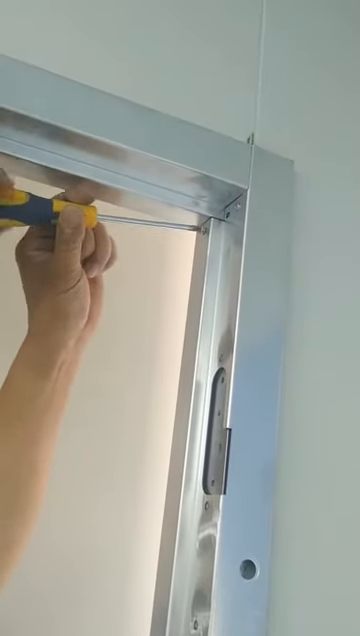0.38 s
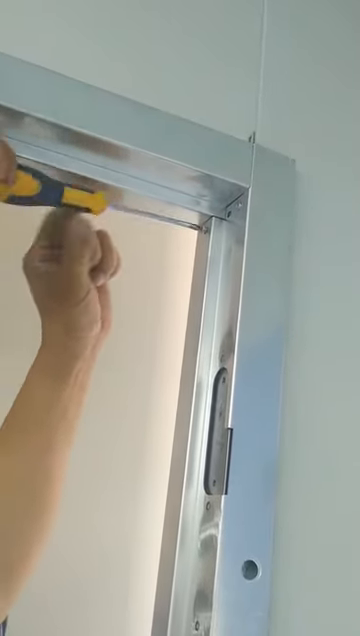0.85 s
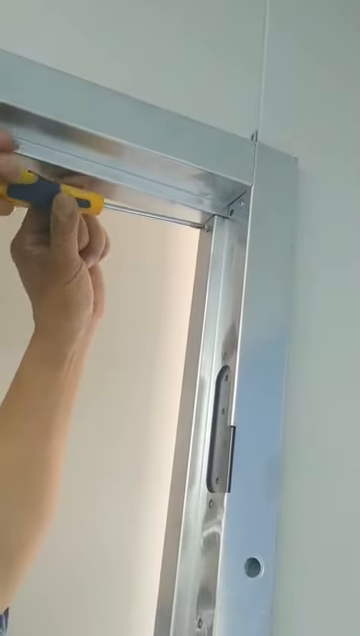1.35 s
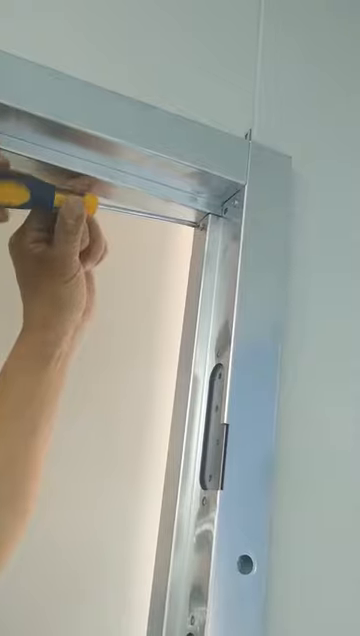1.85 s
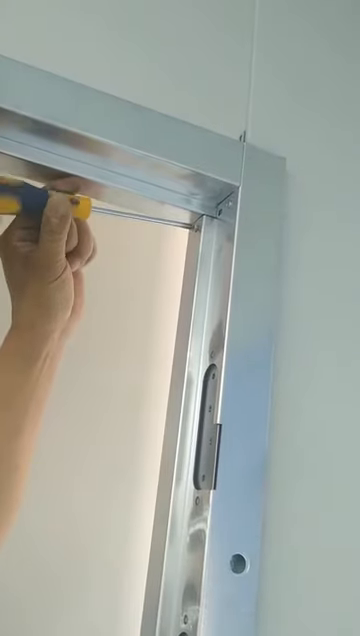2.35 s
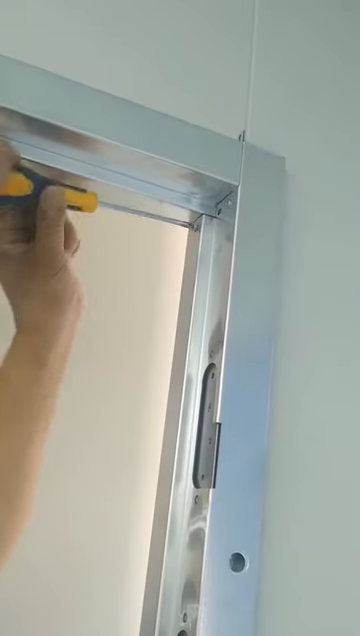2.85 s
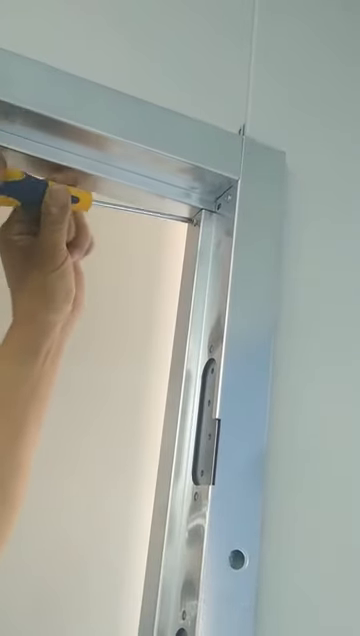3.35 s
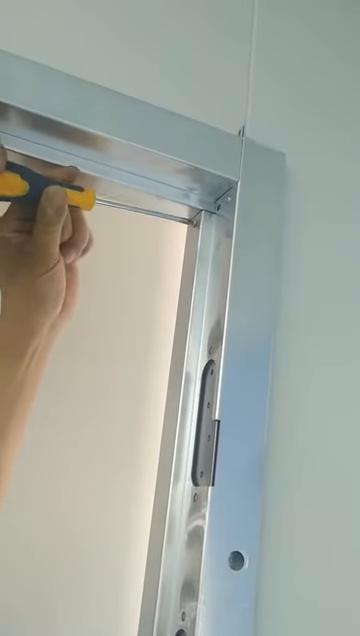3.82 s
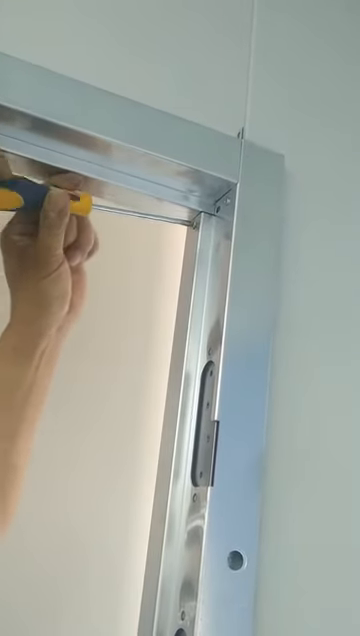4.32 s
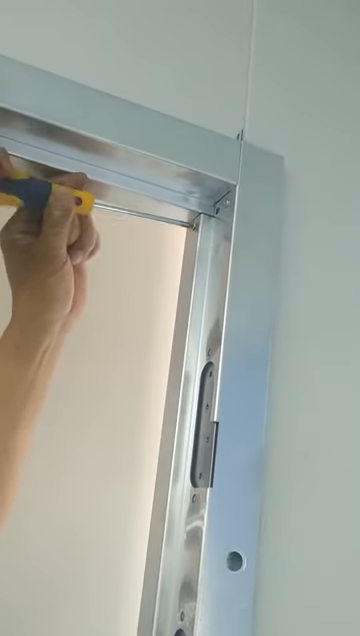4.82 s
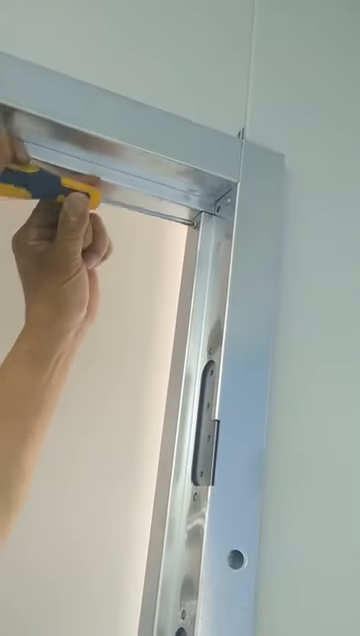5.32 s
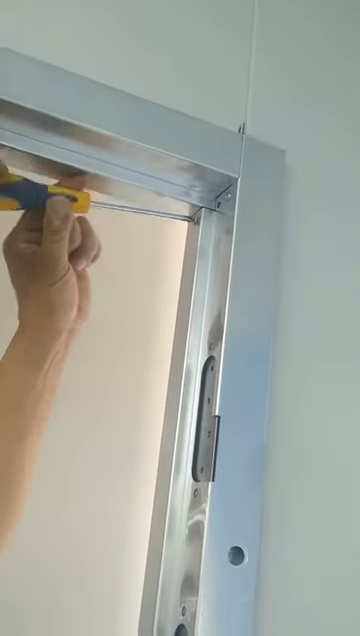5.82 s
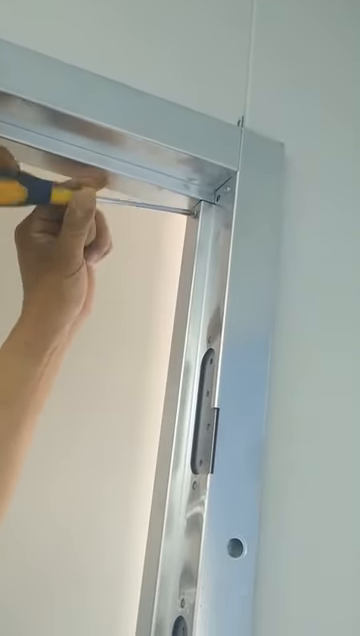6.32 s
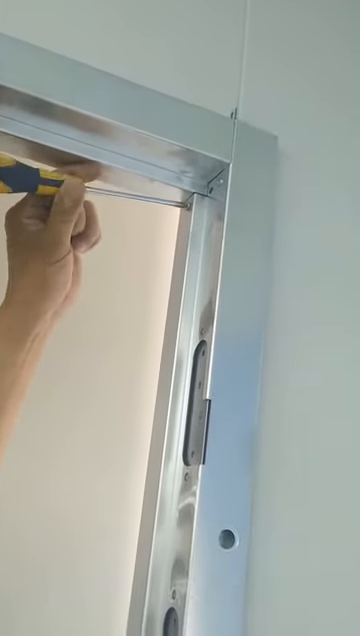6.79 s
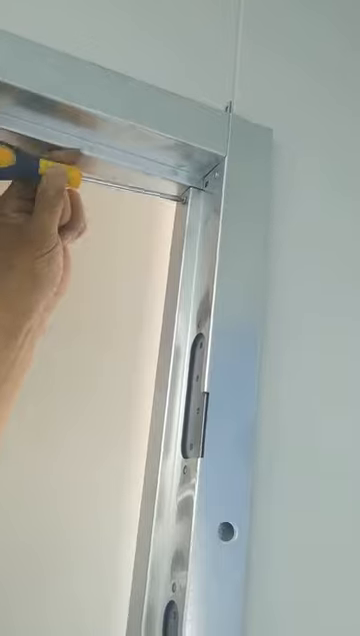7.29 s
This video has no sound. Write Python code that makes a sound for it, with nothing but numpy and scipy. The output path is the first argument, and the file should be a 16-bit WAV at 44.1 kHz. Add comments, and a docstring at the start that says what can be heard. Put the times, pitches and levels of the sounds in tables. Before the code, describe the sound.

Close by in a bare, echoing room, a hand screwdriver turns a screw in a hollow steel frame. Irregular gritty scrapes and dry ticks come with each twist. A sharp hollow knock sounds early, then a louder clank near two seconds. A short falling squeak follows around four seconds, then smaller clicks and rubs. Faint steady room tone lies beneath, picked up by a phone with thin bass.

```python
"""In a bare, echoing room, near a phone, a hand screwdriver turns a screw in a hollow steel door frame.
The tip knocks and slips in the screw head: noise bursts ring modes of frame, shaft and screw.
The thread grinds and squeaks, the tip rasps and fingers slide on the grip: shaped noise, and a gliding tone.
The loose frame jolts as dull booming noise. Room tone lies beneath. The phone suppresses weak bass;
patches of low thrum, a wavering sine with noise, are what its suppressor lets through."""
import sys
import numpy as np
from scipy import signal
from scipy.fft import rfft, irfft, next_fast_len
from scipy.io import wavfile
from scipy.ndimage import uniform_filter1d, map_coordinates

SR = 44100
rng = np.random.default_rng(int(sys.argv[2]) if len(sys.argv) > 2 else 0)


def wrap_up_sound(samples):
    """Save the sound to the file named by the first command line argument, as 16-bit audio."""
    columns = np.atleast_2d(samples).T
    # keep every value between -1 and 1, then stretch to whole-number steps
    tamed = np.clip(columns, -1, 1)
    steps = np.round(tamed * 32767).astype(np.int16)
    wavfile.write(sys.argv[1], SR, steps)


def makeup_ratio(level_db):
    """Linear amplitude ratio for a level in decibels (20 dB per factor of ten)."""
    decades = np.asarray(level_db, float) / 20
    return 10 ** decades


N = 327196  # length [samples]


def unit(x):
    """Scales to rms 1."""
    return x / np.sqrt(np.mean(x ** 2) + 1e-20)


def peak(x):
    """Scales to peak 1."""
    return x / np.abs(x).max()


def along(points, hz):
    """Reads a curve of (frequency, value) points on a log frequency axis."""
    f, v = np.transpose(points)
    return np.interp(np.log(hz + 1), np.log(f + 1), v)


def wobble(rate):
    """A smooth random curve around 0, with rate knots a second."""
    knots = rng.standard_normal(int(N * rate / SR) + 4)
    return map_coordinates(knots, [np.arange(N) * rate / SR])


def filtered(x, response):
    """Multiplies the spectrum of x by a response, a function of frequency."""
    n = x.shape[-1]
    m = next_fast_len(n + 8192)
    return irfft(rfft(x, m) * response(np.fft.rfftfreq(m, 1 / SR)), m)[..., :n]


def resonant(modes):
    """Response of (frequency, width, level) modes in parallel, with alternating signs."""
    def response(f):
        total = 0
        for k, (hz, width, db) in enumerate(modes):
            band = 1j * f * width
            total = total + (-1) ** k * makeup_ratio(db) * band / (hz * hz - f * f + band)
        return total
    return response


def strokes(rows, shape):
    """Gain of (time, hold, level) events whose level swells, sags while held and dies."""
    swell, sag, die = shape  # [dB per s]
    t = np.arange(0, N / SR + .004, .002)
    power = 0
    for s, hold, db in rows:
        held = np.clip(t - s, 0, hold)
        before = np.maximum(s - t, 0)
        after = np.maximum(t - s - held, 0)
        power = power + makeup_ratio(db - swell * before - sag * held - die * after) ** 2
    return np.interp(np.arange(N) / SR, t, np.sqrt(power))


# left-right likeness of diffuse sound: (frequency [Hz], correlation [0..1])
STEREO_LIKENESS = [(100, 0.91), (400, 0.62), (1000, 0.15), (2500, 0.064), (10000, 0.039)]


def rub(spectrum, grain_db, rate):
    """Coloured stereo noise of rms 1 with an uneven, grainy level."""
    pair = rng.standard_normal((2, N)) * makeup_ratio(grain_db * wobble(rate))

    def mid_side(hz):
        turn = np.arccos(np.clip(along(STEREO_LIKENESS, hz), -1, 1)) / 2
        return makeup_ratio(along(spectrum, hz)) * [np.cos(turn), np.sin(turn)]

    mid, side = filtered(pair, mid_side)
    return unit(np.array([mid + side, mid - side]))


# reverberation time: (frequency [Hz], time to fall 60 dB [s])
ROOM_DECAY = [(100, 0.7), (300, 0.85), (700, 0.79), (1400, 0.64), (3000, 0.87), (5000, 0.67),
              (12000, 0.205)]
# strength of the reverberation: (frequency [Hz], level [dB])
ROOM_STRENGTH = [(100, -11), (500, -5.5), (1000, -6.5), (3000, -10.5), (10000, -11)]


def room(x):
    """Reverberates x through a fresh stereo noise tail; each frequency dies at its own speed."""
    hz, t, z = signal.stft(rng.standard_normal((2, SR)), SR, nperseg=256)
    shared = along(STEREO_LIKENESS, hz)[:, None]
    z[1] = shared * z[0] + np.sqrt(np.clip(1 - shared ** 2, 0, 1)) * z[1]
    decay = makeup_ratio(-60 * t / along(ROOM_DECAY, hz)[:, None])
    decay *= (makeup_ratio(along(ROOM_STRENGTH, hz)) / np.linalg.norm(decay, axis=1))[:, None]
    tail = signal.istft(z * decay, SR, nperseg=256)[1]
    tail /= np.sqrt(128 * 96 * np.mean(np.abs(z) ** 2))
    return signal.fftconvolve(x[None], tail, axes=1)


PORT_LAG = 7  # near sounds reach the right port first by this much [samples]
# reflections off the nearest surfaces: (delay [s], left level [dB], right level [dB])
NEAR_SURFACES = [(.0021, -9.5, -10), (.0037, -20, -9.5), (.0062, -8.5, -18), (.0093, -8, -7.5)]


def add(out, s, sound):
    """Places a near sound at both ports, then its nearest reflections and the room tail."""
    start = round(s * SR)
    out[:, start:start + len(sound)] += np.array([np.roll(sound, PORT_LAG), sound])
    for delay, left_db, right_db in NEAR_SURFACES:
        late = start + round(delay * SR)
        out[:, late:late + len(sound)] += sound * makeup_ratio([[left_db], [right_db]])
    wet = room(np.pad(sound, (600, 0)))  # the tail waits 600 samples
    out[:, start:start + wet.shape[1]] += wet


# colour of the room tone: (frequency [Hz], level [dB per Hz])
AIR_SPECTRUM = [(40, 0), (80, 12), (180, -6), (345, -14), (420, 1), (652, -8.5), (937, -14.5), (1370, -5),
                (1430, 4), (1500, -5), (1940, -7.5), (2430, -14), (5350, -20), (9230, -16.5), (15700, -19)]


def room_tone():
    """Steady coloured noise: the air of the room, barely wavering."""
    return makeup_ratio(-68.5) * rub(AIR_SPECTRUM, grain_db=.7, rate=6)


# patches of low thrum that the phone's bass suppressor lets through: (time [s], hold [s], level [dB])
THRUM_PATCHES = [(0.06, .1, -43), (0.21, .05, -49), (0.31, .04, -54), (0.41, .1, -56), (0.54, 0.19, -42),
                 (0.78, .04, -40.5), (0.87, .06, -49), (0.96, .04, -49), (1.04, .04, -52), (1.26, .15, -58),
                 (1.77, .1, -54), (2.27, 0.32, -48), (2.85, 0.025, -51.5), (3.04, 0.062, -64.5),
                 (3.47, .03, -60), (3.61, .15, -54.5), (3.88, 0.0089, -54.5), (4.1, 0.32, -51),
                 (4.48, .01, -60.5), (4.63, 0.075, -56.5), (4.81, 0.091, -69), (5.08, .01, -48),
                 (5.16, .12, -51), (5.35, 0.0087, -44), (5.43, .1, -55), (5.68, 0.052, -54.5),
                 (6.67, 0.074, -54), (6.79, 0.017, -48), (6.88, 0.022, -53.5), (6.98, 0.016, -62),
                 (7.23, .02, -68)]
# noise in the thrum: (frequency [Hz], level [dB per Hz])
THRUM_SPECTRUM = [(30, -39), (50, 5), (85, 2.5), (130, 10), (170, -39)]
THRUM_SHAPE = (600, 41.4, 480)  # (swell, sag while held, die) [dB per s]
THRUM_HZ = 83.1  # centre of the wavering pitch


def thrum():
    """Patches of low thrum near 83 Hz that the bass suppressor lets through: a wavering sine and noise."""
    phase = 2 * np.pi * np.cumsum(THRUM_HZ * (1 + 0.118 * wobble(30))) / SR
    tone = np.sqrt(2) * makeup_ratio(2.2 * wobble(40)) * np.sin(phase)
    noise = makeup_ratio(-2.5) * rub(THRUM_SPECTRUM, grain_db=3.0, rate=23)
    return strokes(THRUM_PATCHES, THRUM_SHAPE) * (tone + noise)


# dull jolts of the loose frame: (time [s], hold [s], level [dB])
JOLT_MOVES = [(0.04, 0.059, -48), (0.29, 0.0079, -60), (0.41, .01, -55.5), (0.51, 0.085, -45),
              (0.78, 0.12, -49.5), (1.24, 0.011, -41.5), (1.5, 0.012, -51.5), (1.77, 0.009, -45),
              (2.27, 0.019, -35), (2.58, .01, -51.5), (2.78, 0.1, -59), (3.08, 0.023, -51.5),
              (3.3, 0.0085, -60), (3.61, 0.056, -50), (4.09, 0.018, -43), (4.62, .01, -45.5),
              (4.81, 0.008, -53.5), (5.08, 0.012, -42.5), (5.16, .01, -46), (5.35, 0.009, -58),
              (5.56, 0.13, -58.5), (5.86, 0.0081, -60), (6.12, .01, -49.5), (6.53, 0.032, -58),
              (6.67, .01, -44.5), (6.8, 0.0092, -51), (6.94, 0.0066, -53.5), (7.2, 0.038, -49.5)]
# boom of the jolts: (frequency [Hz], level [dB per Hz])
BOOM_SPECTRUM = [(110, -40), (170, -5), (220, -3), (300, 0), (350, -6), (430, -40)]
JOLT_SHAPE = (470, 34, 197)  # (swell, sag while held, die) [dB per s]


def jolts():
    """Dull jolts of the loose frame: swells of booming low noise."""
    return strokes(JOLT_MOVES, JOLT_SHAPE) * rub(BOOM_SPECTRUM, grain_db=1.5, rate=40)


# glide of the thread squeak: (time [s], pitch [Hz], level [dB])
SQUEAK_GLIDE = [(4.262, 2070, -52), (4.28, 1993, -44), (4.305, 1910, -44.5), (4.335, 1877, -50),
                (4.4, 1853, -60), (4.58, 1862, -66)]


def squeak():
    """The thread sticks and slips: a rough tone, mostly falling in pitch, with its room tail."""
    s, pitch, level = np.transpose(SQUEAK_GLIDE)
    t = np.arange(N) / SR
    hz, db = np.interp(t, s, pitch), np.interp(t, s, level)
    sounding = uniform_filter1d(((t > s[0]) & (t < s[-1])) * 1., size=400)
    phase = 2 * np.pi * np.cumsum(hz * (1 + .024 * wobble(300))) / SR
    tone = np.sqrt(2) * makeup_ratio(db + 3 * wobble(150)) * sounding * np.sin(phase)
    return tone + makeup_ratio(-4) * room(tone)[:, :N]


# twists of the wrist:
# (time [s], hold [s], thread grind level [dB], tip rasp level [dB], grip rustle level [dB])
WRIST_TWISTS = [(0.038, .01, -46.5, -55.5, -58.5), (0.476, .01, -49.5, -80, -70),
                (0.572, 0.009, -52.5, -58, -84), (0.756, .01, -58, -80, -64),
                (0.976, 0.073, -75, -63.5, -85), (1.233, .01, -53, -72, -64.5), (1.733, .01, -43, -53, -63),
                (2.056, 0.0078, -55, -64.5, -72), (2.249, .02, -39.5, -45.5, -79),
                (2.666, 0.008, -64, -74, -58.5), (2.744, 0.018, -78, -45, -47.5),
                (3.07, 0.0088, -50, -51.5, -61), (3.31, 0.012, -78, -82, -73.5),
                (3.559, .01, -55.5, -56, -61), (3.888, .01, -74, -65, -67), (4.104, 0.0066, -39, -70, -56),
                (4.168, .01, -61, -64, -52.5), (4.21, .2, -68, -47.5, -82), (4.592, .01, -48, -63, -56),
                (5.06, 0.009, -63, -63.5, -59), (5.303, .01, -71, -65.5, -80),
                (5.591, 0.07, -56, -56.5, -63), (5.941, 0.0089, -60.5, -65, -65.5),
                (6.118, .01, -56, -69, -62.5), (6.3, .12, -68, -69, -80), (6.523, 0.094, -61, -70, -80),
                (6.67, 0.0075, -49.5, -60, -56), (6.995, .01, -68, -60, -60),
                (7.198, 0.0076, -45, -51.5, -67)]
# fingers shift on the grip: (time [s], hold [s], level [dB])
FINGER_SLIDES = [(0.95, .12, -62.5), (4.86, 0.063, -56.5), (5.16, 0.16, -56), (6.2, .2, -71)]
# colour of the thread grind: (frequency [Hz], level [dB per Hz])
GRIND_SPECTRUM = [(210, -20.5), (350, -7.5), (543, -6.5), (759, -7), (1260, -7), (1370, -12), (1550, -16),
                  (2190, -13), (4000, -24.5), (5200, -44.5), (8800, -120)]
# colour of the tip's rasp: (frequency [Hz], level [dB per Hz])
RASP_SPECTRUM = [(1760, -18), (3000, -8), (3350, -8), (4330, -8.5), (4770, -13.5), (10200, -12),
                 (10900, -15), (15700, -43)]
# colour of skin on the grip: (frequency [Hz], level [dB per Hz])
SKIN_SPECTRUM = [(8000, -32), (11400, -13), (12200, 0), (12700, -2), (13400, -12), (15800, -14)]
# how they (swell, sag while held, die) [dB per s]
GRIND_SHAPE, RASP_SHAPE, SKIN_SHAPE = (357, 14, 141), (360, 13, 257), (470, 5, 340)
GRIND_REST_DB, RASP_REST_DB = -71, -80  # the tip never leaves the screw


def turning():
    """Thread, tip and fingers rub, catching and letting go, while the hand twists: three grainy noises."""
    def twist(column, shape):
        return strokes([(row[0], row[1], row[column]) for row in WRIST_TWISTS], shape)

    grind_gain = twist(2, GRIND_SHAPE) + makeup_ratio(GRIND_REST_DB)
    rasp_gain = twist(3, RASP_SHAPE) + makeup_ratio(RASP_REST_DB)
    skin_gain = twist(4, SKIN_SHAPE) + strokes(FINGER_SLIDES, SKIN_SHAPE)
    grind = grind_gain * rub(GRIND_SPECTRUM, grain_db=2.5, rate=160)
    rasp = rasp_gain * rub(RASP_SPECTRUM, grain_db=2.5, rate=450)
    skin = skin_gain * rub(SKIN_SPECTRUM, grain_db=1.5, rate=60)
    return grind + rasp + skin


# gritty slips of tip and thread; brightness (rasp) and frame are relative to the grit:
# (time [s], grit peak [dB], brightness [dB], frame [dB], swell [s])
TIP_SLIPS = [(0.0341, -38, -30, 1.5, 0.013), (0.2658, -62, 7.5, -17, 0.016),
             (0.4414, -38.5, -2.5, -14, 0.027), (0.4996, -51.5, -18, 6, 0.018), (0.575, -49, -8, 2, 0.01),
             (0.789, -54.5, 3.5, 6, 0.039), (0.8437, -39.5, -27, -4, 0.0083),
             (0.9941, -49, -35, -11, 0.017), (1.2146, -32.5, -5.5, 4.5, 0.024),
             (1.697, -36.5, -16, -12, 0.032), (1.7605, -45, 2, -2, 0.011),
             (2.0294, -42.5, -23.5, -3, 0.0061), (2.18, -35, -2, -24, 0.028),
             (2.6461, -44.5, -1, 0.5, 0.014), (2.72, -32, -5, -28, 0.022), (2.7903, -47, -2, -3, 0.04),
             (3.045, -38.5, -10, -12, 0.022), (3.2775, -62.5, 1, -4, 0.032),
             (3.5271, -40.5, -12, -6, 0.027), (3.596, -48, -8, 7.5, 0.02),
             (3.8785, -54.5, 5.5, -0.5, 0.011), (4.052, -31, -2, -9, 0.048), (4.1, -32.5, 3.5, -26, 0.013),
             (4.158, -33, 2, -20, 0.009), (4.2001, -39, -2, -25, 0.041), (4.3087, -33.5, 6, -30.5, 0.0213),
             (4.3243, -31.5, 6.5, -43, 0.011), (4.5746, -35.5, 0, -4, 0.022), (4.897, -56.5, 5.5, 3, 0.026),
             (5.059, -57, -16, 15.5, 0.02), (5.5497, -40, -5, -8, 0.024), (5.5975, -44, -8, -9, 0.019),
             (5.651, -59, -14, -5, 0.01), (5.9351, -44, 2.5, -9.5, 0.017), (6.0731, -45, -1, 5, 0.034),
             (6.1238, -40, -1.5, -15.5, 0.026), (6.53, -44.5, -19, -14, 0.035),
             (6.6455, -35.5, -4, -10, 0.019), (6.9777, -57, 12.5, -17, 0.008),
             (7.1434, -38.5, -4, -4.5, 0.035)]
# colour of the grit: (frequency [Hz], level [dB per Hz])
GRIT_SPECTRUM = [(300, -53), (700, -20), (1300, -1.5), (2000, 1), (3000, 0.5), (4000, -12.5), (6000, -30.5)]
# modes of the hollow frame: (frequency [Hz], width [Hz], level [dB])
FRAME_MODES = [(290, 60, -3), (365, 70, 1), (455, 70, -1), (560, 80, -5), (655, 70, -1), (790, 90, -3),
               (950, 150, -11), (1200, 120, -10), (1390, 120, -10), (1630, 150, -12), (2020, 250, -14),
               (2500, 300, -14), (2970, 350, -17), (3800, 300, -19), (4350, 400, -19)]


def slips():
    """Each slip swells and fades as a cluster of grains of grit, rasp and ringing frame."""
    out = np.zeros((2, N + 2 * SR))
    t = np.arange(SR // 3) / SR
    for s, db, bright_db, frame_db, swell in TIP_SLIPS:
        u = t / max(swell, .004)
        grains = np.repeat(makeup_ratio(5.5 * rng.standard_normal(len(t) // 40 + 1)), 40)[:len(t)]
        noise = rng.standard_normal((3, len(t))) * grains * (u * np.exp(1 - u)) ** 2
        # each slip has its own random colour
        colour = list(zip(np.geomspace(600, 15000, num=40), rng.normal(0, 4.1, size=40)))
        grit = filtered(noise[0], lambda hz: makeup_ratio(along(GRIT_SPECTRUM, hz) + along(colour, hz)))
        rasp = filtered(noise[1], lambda hz: makeup_ratio(along(RASP_SPECTRUM, hz) + along(colour, hz)))
        frame = filtered(noise[2], resonant(FRAME_MODES))
        add(out, s, makeup_ratio(db) * (peak(grit) + makeup_ratio(bright_db) * peak(rasp) + makeup_ratio(frame_db) * peak(frame)))
    return out[:, :N]


# tip against screw head and frame; thud and brightness (steel) are relative to the frame:
# (time [s], frame peak [dB], thud [dB], brightness [dB], hardness [dB per octave])
TIP_KNOCKS = [(0.027, -32.5, -6, -12, 6.5), (0.456, -41.5, -1, -18.5, 5), (0.529, -30.5, -7.5, -32, -2.5),
              (0.745, -43, -23, -12, -1), (0.778, -33, 2, -15, -3.5), (0.835, -31.5, -4, -18, 3.5),
              (1.242, -15.5, -11, -26, 1), (1.568, -49.5, -22.5, -10, 3), (1.697, -30.5, -11, -20, 2),
              (1.833, -39.5, -4.5, -33, 0.5), (2.025, -36, -41, -9.5, 4), (2.261, -9.5, -11, -15, .5),
              (2.665, -40.5, -14, -15, 0.5), (3.008, -37, -20, -25, 2.5), (3.528, -31.5, -15, -15.5, 1.5),
              (3.596, -30, -8, -17.5, -0.5), (3.876, -43.5, -10, -14, 1.5), (4.068, -42, -10, -9, 2),
              (4.088, -26.5, -1, -12, 1), (4.164, -33, -17, -3, 6.5), (4.604, -40, 0, -12, 2),
              (4.896, -35.5, -16, -17, 0.5), (5.081, -31, 3, -22, -2), (5.325, -53, 4, -4, -1),
              (5.372, -38, -17, -35, -1.5), (5.663, -36.5, -12.5, -10, 2), (5.944, -43, -40, 1.5, 4.5),
              (6.107, -42, -15, -11, -3), (6.666, -32, -5, -6, 0.5), (6.979, -53, -17, 10, 4),
              (7.138, -43.5, -17, -10.5, 0.5)]
# modes of shaft and screw: (frequency [Hz], width [Hz], level [dB])
STEEL_MODES = [(4100, 220, -6), (4280, 570, -3.5), (6100, 280, 0.5), (7150, 2700, -2.5), (8980, 950, 3.5),
               (10900, 590, -3), (14200, 4800, -26)]
# modes of the thud: (frequency [Hz], width [Hz], level [dB])
THUD_MODES = [(89, 100, -5), (182.3, 43, 4), (283, 122, -3)]
CHATTER_S, CHATTER_S_PER_DB = 0.016, -0.0025  # contact length at -34.5 dB; firmer ones are shorter
PUSH_HZ, PUSH_SHARE = 500, .4  # modes under this follow the thud: light ticks barely move them
# hum: level for a -9.5 dB knock, relative to it [dB]; extra fall per dB of softer knock; swell; decay
HUM_DB, HUM_GROWS, HUM_SWELL_S, HUM_T60_S = -21, .35, .03, .98
HUM_DB_PER_OCTAVE = -3.5  # the hum is darker than the blow


def struck_modes(thud_db, hard_db):
    """Frame modes as one blow excites them: hard blows favour high modes, thuds the low ones."""
    struck = []
    for hz, width, db in FRAME_MODES:
        tilt = hard_db * np.log2(hz / 700)
        push = (hz < PUSH_HZ) * PUSH_SHARE * (thud_db + 11)
        struck.append((hz, width, db + tilt + push + rng.normal(0, 1)))
    return struck


def frame_hum(struck):
    """The frame hums on: noise through modes half as wide, swelling and then decaying unevenly."""
    t = np.arange(SR * 3 // 4) / SR
    modes = [(hz, 0.5 * width, db + HUM_DB_PER_OCTAVE * np.log2(hz / 700)) for hz, width, db in struck]
    hum = unit(filtered(rng.standard_normal(len(t)), resonant(modes)))
    swell = 1 - np.exp(-t / HUM_SWELL_S)
    return hum * swell * makeup_ratio(-60 * t / HUM_T60_S + 2.5 * wobble(35)[:len(t)])


def knocks():
    """Each contact is a short chatter of the tip that rings frame, shaft and thud; the frame hums on."""
    out = np.zeros((2, N + 2 * SR))
    t = np.arange(SR // 5) / SR
    for s, db, thud_db, bright_db, hard_db in TIP_KNOCKS:
        length = max(CHATTER_S + CHATTER_S_PER_DB * (db + 34.5), .002)
        chatter = rng.standard_normal((3, len(t))) * np.exp(-(t / length) ** 2.2)
        chatter[0, :8] += 3.5  # the first touch is one firm push
        chatter[1] *= 1 - np.exp(-t / 0.00158)  # the shaft takes a moment to rattle
        struck = struck_modes(thud_db, hard_db)
        frame = peak(filtered(chatter[0], resonant(struck)))
        steel = peak(filtered(chatter[1], resonant(STEEL_MODES)))
        thud = peak(filtered(chatter[2], resonant(THUD_MODES)))
        add(out, s, makeup_ratio(db) * (frame + makeup_ratio(thud_db) * thud + makeup_ratio(bright_db) * steel))
        hum = makeup_ratio(db + HUM_DB + HUM_GROWS * (db + 9.5)) * frame_hum(struck)
        start = round(s * SR)
        out[:, start:start + len(hum)] += hum
    return out[:, :N]


def scene():
    """All sources over the room tone."""
    return room_tone() + thrum() + jolts() + squeak() + turning() + slips() + knocks()


def suppress_bass(x, edge_hz=392, threshold_db=-71, floor_db=-22):
    """Turns down bass bins whose smoothed power is under the threshold."""
    hz, _, z = signal.stft(x, SR, nperseg=1024, noverlap=896)
    power = uniform_filter1d(np.mean(np.abs(z) ** 2, axis=0), size=5, axis=1)  # over time
    power = uniform_filter1d(power, size=2, axis=0)  # over frequency
    gain = np.maximum(power ** 2 / (power ** 2 + makeup_ratio(threshold_db) ** 4), makeup_ratio(floor_db))
    gain[hz > edge_hz] = 1
    return signal.istft(z * gain, SR, nperseg=1024, noverlap=896)[1][:, :N]


# colour difference of the phone's two ports: (frequency [Hz], left over right level [dB])
PORT_COLOUR = [(60, -4), (150, 2), (380, -1.5), (950, 1.5), (2380, 5.5), (5980, -4), (15000, 6.5)]


def port_response(hz):
    """Both ports lose the deepest bass; each takes half the colour difference."""
    low_cut = hz ** 3 / (hz ** 3 + 42 ** 3)
    return low_cut * makeup_ratio(along(PORT_COLOUR, hz) / 2 * np.array([[1], [-1]]))


def band_limit(x):
    """A steep low-pass at the top of the band."""
    return signal.sosfilt(signal.butter(12, 15840, fs=SR, output="sos"), x)


def record(dry):
    """The phone's two ports colour the sound, then its bass suppressor works on both."""
    ports = filtered(dry, port_response)
    finished = suppress_bass(ports)
    return band_limit(finished)


dry = scene()
out = record(dry)
wrap_up_sound(out)
```